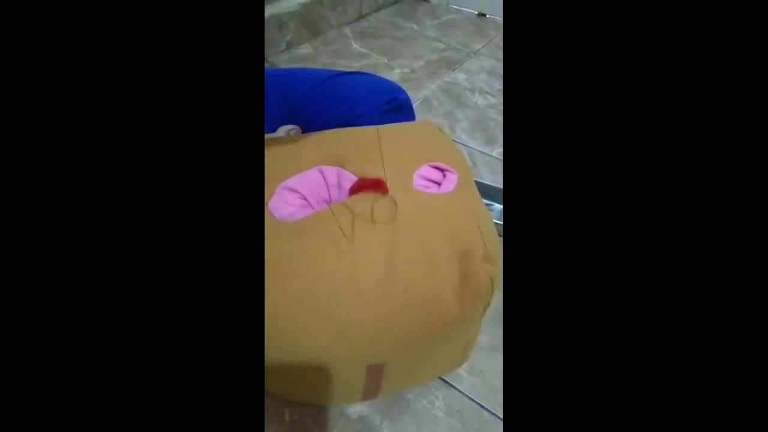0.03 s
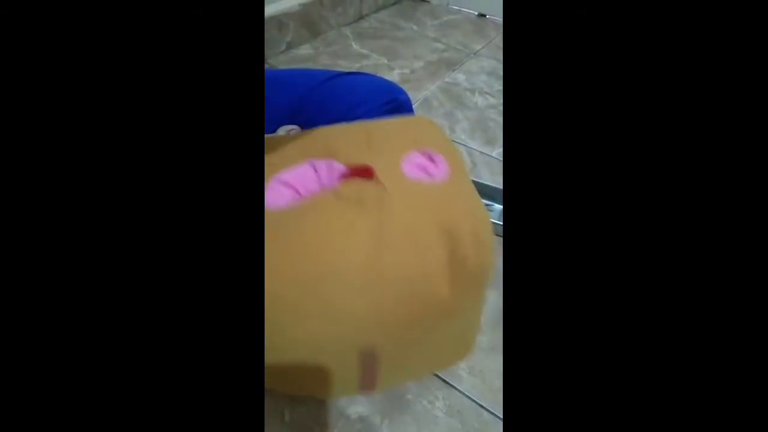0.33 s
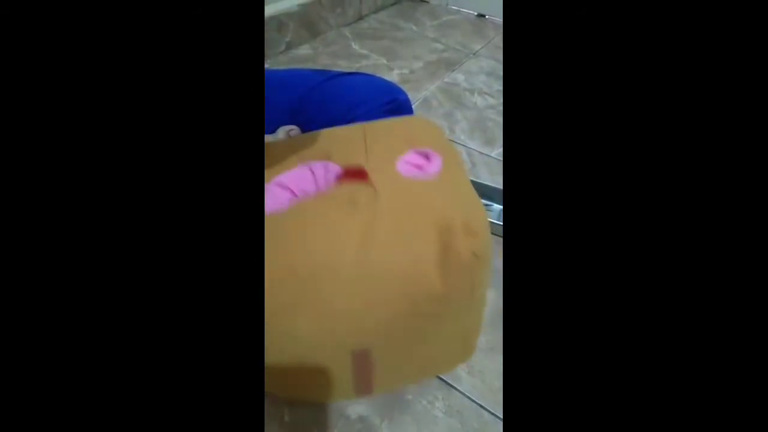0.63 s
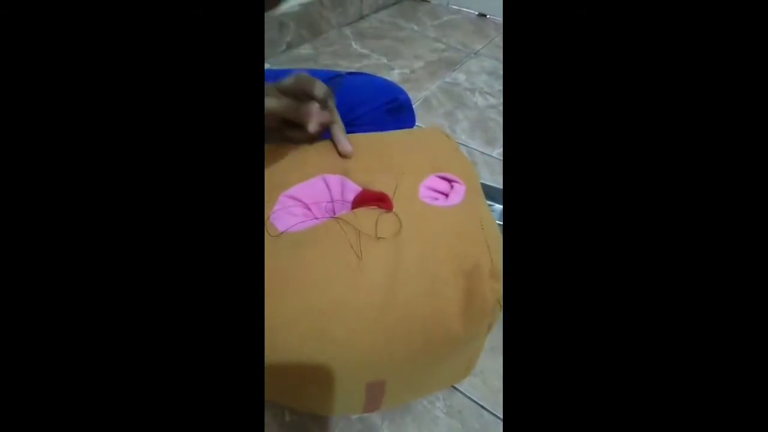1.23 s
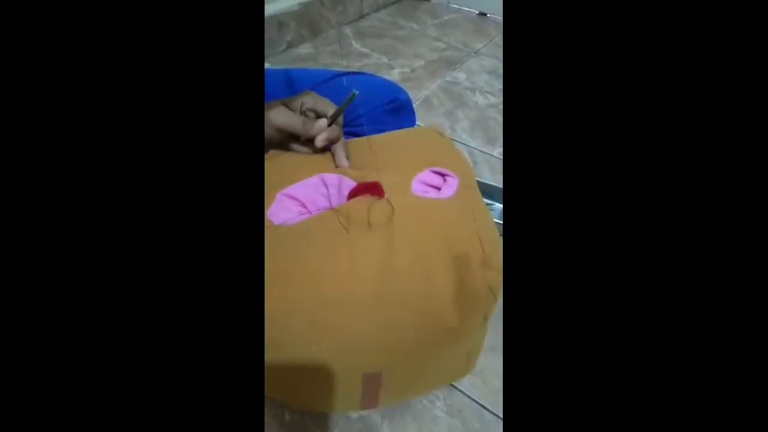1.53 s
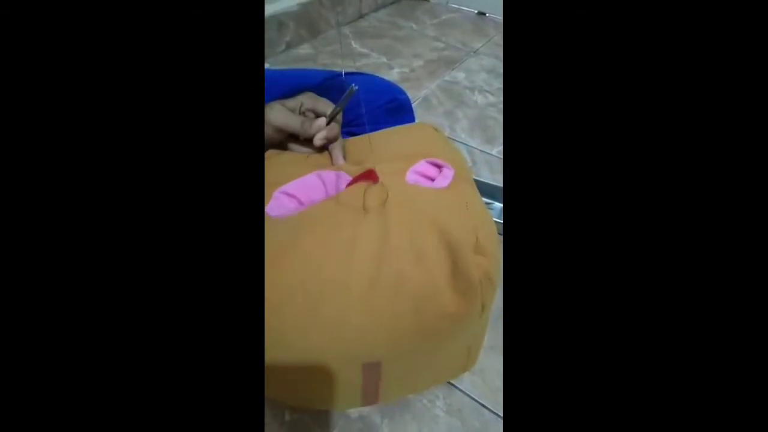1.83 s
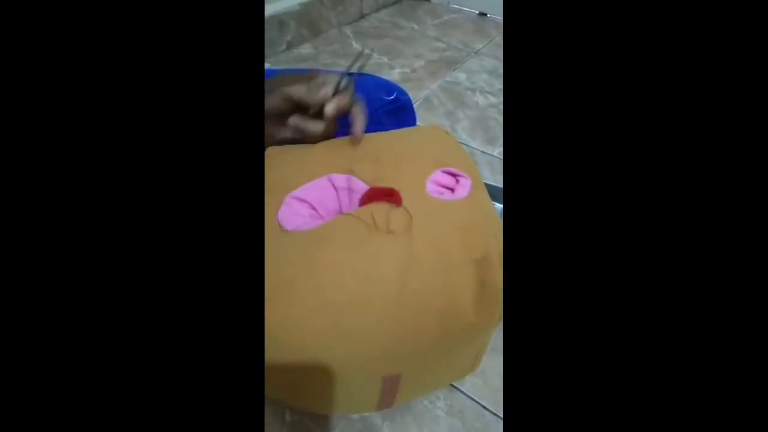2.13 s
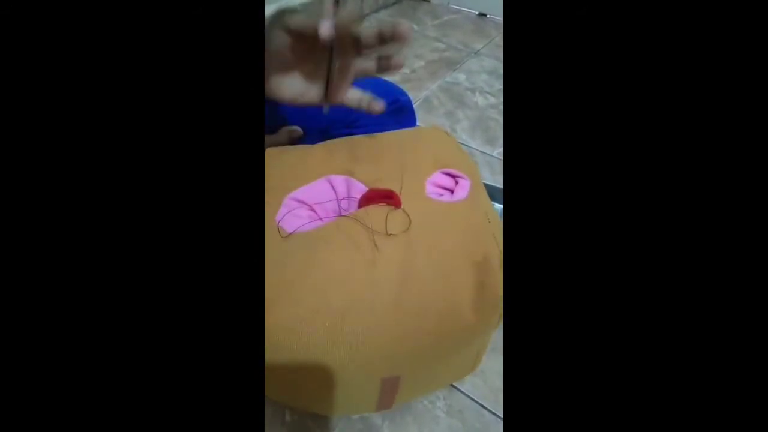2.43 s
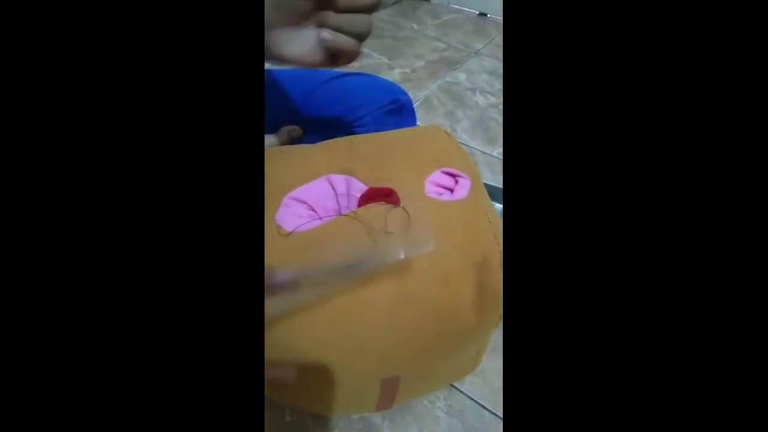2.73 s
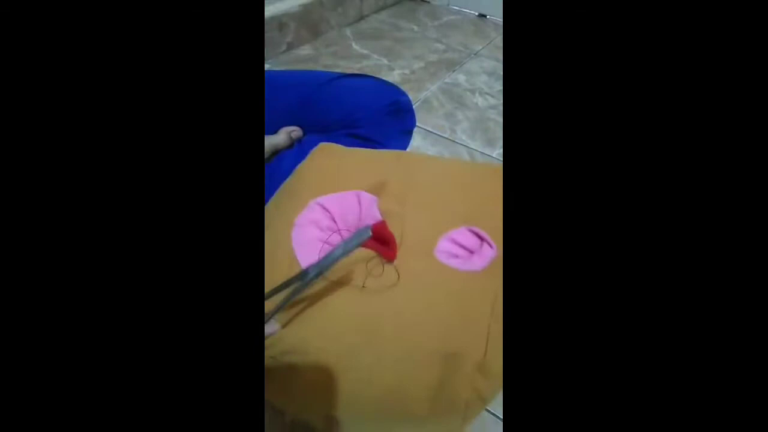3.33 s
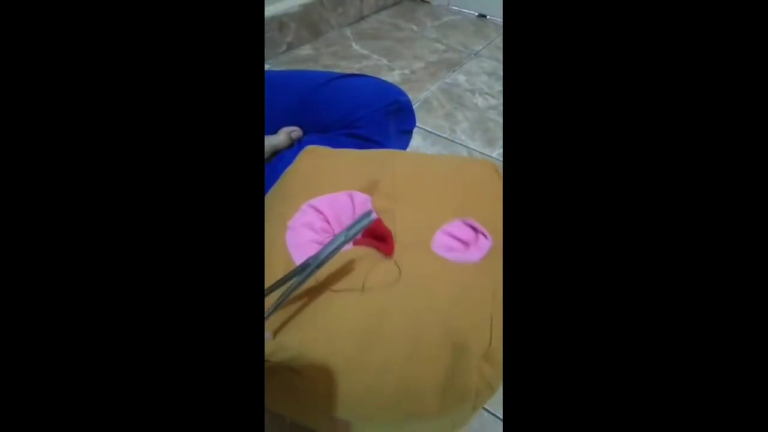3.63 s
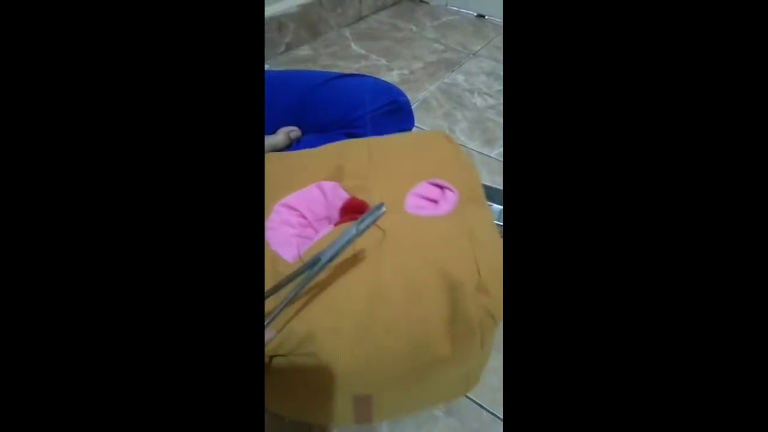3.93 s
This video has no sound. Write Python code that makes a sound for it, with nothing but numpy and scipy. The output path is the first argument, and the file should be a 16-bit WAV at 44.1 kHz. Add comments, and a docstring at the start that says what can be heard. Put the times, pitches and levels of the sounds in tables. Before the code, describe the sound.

Steel scissors are handled close by in a small room. A faint slide at 0.5 seconds leads to one bright clink at 1 second and a dry tick at 3 seconds. A small hollow knock follows at about 3.5 seconds. Throughout, a fan hisses steadily and its draught buffets the microphone in quick low puffs and thumps, while cloth rustles very faintly now and then.

```python
"""Steel scissors are picked up and handled close by in a small tiled room: a faint slide, one bright
clink as the blades meet, one dry tick from the loose pivot. A fan hisses steadily, and its draught
buffets the microphone in quick low puffs and thumps. Cloth rustles faintly under the hands, and
near the end something gives a small hollow knock."""
import sys
import numpy as np
from scipy import signal
from scipy.fft import rfft, irfft
from scipy.io import wavfile
from scipy.ndimage import map_coordinates

SR = 44100
rng = np.random.default_rng(int(sys.argv[2]) if len(sys.argv) > 2 else 0)


def generate_wav(signal):
    """Clip the signal to [-1, 1] and save it as 16-bit WAV at the path in sys.argv[1]."""
    frames = np.transpose(np.atleast_2d(signal))
    scaled = np.clip(frames, -1, 1) * 32767
    pcm = np.round(scaled).astype(np.int16)
    wavfile.write(sys.argv[1], SR, pcm)


N = 4 * SR


def amp(db):
    """Decibels to gain."""
    return 10 ** (np.asarray(db) / 20)


def unit_rms(x):
    """Normalises to an rms of one."""
    return x / np.sqrt(np.mean(x ** 2) + 1e-20)


def equalise(x, curve):
    """Shapes the tone with an EQ curve of (f/Hz, level/dB) points."""
    hz, db = np.transpose(curve)
    bins_hz = np.fft.rfftfreq(len(x), 1 / SR)
    gain = amp(np.interp(np.log(bins_hz + 1), np.log(hz), db))
    return irfft(rfft(x) * gain, len(x))


def drift(rate_hz):
    """Smooth random modulation with an rms of one."""
    hz = np.fft.rfftfreq(N, 1 / SR)
    rolloff = np.exp(-(hz / rate_hz) ** 2) * (hz > 0)
    return unit_rms(irfft(rfft(rng.standard_normal(N)) * rolloff, N))


def swell(middle_s, length_s, edge):
    """Power envelope around a moment; a higher edge gives steeper fades."""
    distance = abs(2 * (np.arange(N) / SR - middle_s) / length_s)
    return np.exp(-np.minimum(distance, 20) ** edge)


def add(mix, start_s, sound):
    """Drops a sound into the mix at its cue."""
    part = mix[round(start_s * SR):][:len(sound)]
    part += sound[:len(part)]


# EQ of the fan's air hiss: f/Hz, relative level/dB
HISS_EQ = [(25, 17.5), (200, 8), (400, 1), (490, 2.5), (620, -2.5), (740, 1.5), (880, -0.5), (1050, 0.5),
           (1290, -1.5), (2050, 1.5), (2600, -0.5), (2850, -4), (5000, -10), (6200, -12), (6900, -19),
           (7400, -34.5), (8000, -60)]
# motor tones: f/Hz, level/dB
MOTOR_TONES = [(2564, -68.5), (507, -67.5), (1035, -70)]

def fan(hiss_db=-48, waver_db=0.64, wander_hz=2.5):
    """A steady bed of air hiss with a few faint, wavering motor tones."""
    air = unit_rms(equalise(rng.standard_normal(N), HISS_EQ))
    hiss = air * amp(hiss_db + waver_db * drift(rate_hz=12))
    whine = np.zeros(N)
    for hz, db in MOTOR_TONES:
        cycles = np.cumsum(hz + wander_hz * drift(rate_hz=6)) / SR
        whine += amp(db) * np.sqrt(2) * np.sin(2 * np.pi * cycles)
    return hiss + whine


# puffs of the draught: middle t/s, length/s, level/dB
DRAUGHT_PUFFS = [(0.059,0.0497,-32),(0.131,0.0498,-28),(0.247,0.0396,-27),(.34,0.05014,-28),(0.469,0.0407,-25),(0.521,0.0404,-29),(0.579,0.03965,-26),(0.774,.15,-32),
                 (0.961,.14,-33),(1.109,0.0603,-28),(1.278,0.07064,-29.5),(1.399,0.0399,-26),(1.5,0.02997,-26),(1.6,.11,-29),(1.7,0.0302,-25),(1.873,0.1213,-32),
                 (1.961,0.0696,-29),(2.037,0.03043,-27),(2.119,0.0791,-25),(2.21,0.03006,-26),(2.329,.11,-30),(2.441,0.04965,-30),(2.511,.04,-33.5),(2.67,0.0813,-32),
                 (2.734,0.02995,-27.5),(2.889,.1,-33),(3.039,.04,-33),(3.098,0.02974,-29),(3.181,0.1117,-35),(3.3,0.03015,-27.5),(3.38,0.0401,-30),(3.469,0.0898,-31),
                 (3.561,0.0495,-28),(3.62,.02,-27),(3.77,.02,-26.5),(3.838,0.0604,-28),(3.935,0.0919,-30)]
# EQ of the turbulent rumble: f/Hz, relative level/dB
EDDY_EQ = [(20, -18.5), (45, -20.5), (74, 2.5), (105, 1.5), (170, -1), (250, -5.5), (350, -16.5),
           (500, -30.5), (750, -42), (1400, -75.5)]

def draught(lull_db=-45, flutter_db=2, compression=0.69):
    """Eddies sweep over the microphone; each puff drives them harder and faster."""
    power = np.full(N, amp(lull_db) ** 2)
    for middle_s, length_s, db in DRAUGHT_PUFFS:
        power += amp(db) ** 2 * swell(middle_s, length_s, edge=4)
    eddies = unit_rms(equalise(rng.standard_normal(2 * N), EDDY_EQ))
    # compress the rumble so that the puffs carry the dynamics
    window = signal.windows.hann(int(0.068 * SR))
    eddy_power = np.abs(signal.oaconvolve(eddies ** 2, window / window.sum(), "same"))
    eddies = unit_rms(eddies / eddy_power ** (compression / 2))
    flutter = unit_rms(amp(flutter_db * drift(rate_hz=45.2)))
    envelope = np.sqrt(power) * flutter
    travel = np.cumsum(unit_rms(envelope) ** 0.15)  # varispeed: stronger air lifts the pitch
    return envelope * map_coordinates(eddies, [travel], order=3, mode="wrap")


# single hard eddies hitting the microphone: t/s, level/dB, f/Hz
HARD_EDDIES = [(0.109, -20, 218), (0.1235, -27, 237), (0.133, -21, 178), (0.149, -20, 135),
               (0.2616, -18.5, 178), (0.759, -17.5, 190), (0.8049, -18.5, 215.3), (0.908, -21, 130),
               (0.9292, -21, 135), (1.079, -18, 199), (1.0898, -20.5, 130.4), (1.126, -20.5, 123),
               (1.282, -23, 126), (1.3017, -20.5, 220.2), (1.3949, -10.5, 221.8), (1.3981, -10.5, 303),
               (1.5483, -23, 215.7), (1.621, -26, 163.7), (1.6328, -18.5, 193), (1.689, -22.5, 221.3),
               (1.7093, -17, 202.5), (1.9101, -20.5, 219), (2.2004, -24.5, 240), (2.713, -16.5, 173),
               (2.8185, -20.5, 215), (2.882, -22.5, 179.9), (2.9225, -18, 178), (3.0368, -21, 168.4),
               (3.1078, -19, 168), (3.2775, -18, 198), (3.2861, -19.5, 175), (3.3613, -21, 144),
               (3.392, -21.5, 185), (3.5419, -25.5, 240), (3.548, -22.5, 190), (3.612, -29, 280),
               (3.6152, -16.5, 138), (3.8151, -21, 230), (3.8284, -19, 198), (3.8538, -23, 192),
               (3.9046, -18.5, 127.6), (3.945, -20, 148), (3.954, -23.5, 140)]

def thumps(low_cut_hz=94, q=1.96):
    """Each hard eddy is one push and pull of pressure; the microphone's low cut adds a short wobble."""
    t, pressure = np.arange(N) / SR, np.zeros(N)
    for middle_s, db, hz in HARD_EDDIES:
        phase = 2 * np.pi * hz * (t - middle_s)
        pressure -= amp(db) * phase * (8 / (7 + phase ** 2)) ** 4
    omega = 2 * np.pi * low_cut_hz
    resonant_cut = signal.bilinear([1, 0, 0], [1, omega / q, omega ** 2], SR)
    return signal.lfilter(*resonant_cut, pressure)


# cloth rustles: middle t/s, length/s, level/dB, centre f/Hz, width/octaves
CLOTH_RUSTLES = [(0.519, 0.068, -59, 4920, 0.43), (0.826, 0.04, -60.5, 5700, 0.21),
                 (1.68, 0.26, -65.5, 2400, 0.44), (1.95, 0.16, -65.5, 5660, 0.34),
                 (2.874, 0.12, -61, 5000, 0.5), (3.646, 0.19, -62, 4324, 0.62),
                 (3.834, 0.11, -57.5, 4300, 0.77)]

def cloth(grain_db=3):
    """Hands brush over fabric in soft, grainy swishes."""
    hz, rustle = np.fft.rfftfreq(N, 1 / SR), np.zeros(N)
    for middle_s, length_s, db, centre_hz, octaves in CLOTH_RUSTLES:
        band = np.exp(-2 * (np.log2((hz + 1) / centre_hz) / octaves) ** 2)
        fibres = rng.standard_normal(N) * amp(grain_db * drift(rate_hz=78))
        swish = unit_rms(irfft(rfft(fibres) * band, N))
        rustle += amp(db) * swish * np.sqrt(swell(middle_s, length_s, edge=1.7))
    return rustle


def slide(middle_s, length_s=0.13, level_db=-61.5, pitch_hz=3630, jitter_hz=74):
    """Steel slides lightly: a thin, even scrape around one unsteady pitch."""
    cycles = np.cumsum(pitch_hz + jitter_hz * drift(rate_hz=200)) / SR
    envelope = np.sqrt(2 * swell(middle_s, length_s, edge=3))
    return amp(level_db) * envelope * np.sin(2 * np.pi * cycles)


# hand-damped blade modes, the bright attack: f/Hz, relative level/dB, T60/s
BLADE_MODES = [(2900, -11.5, .008), (3394, -9, 0.014), (4535, -11.5, .014), (5380, -10.5, .016),
               (5640, -20, 0.009), (6390, -0.5, 0.012), (7060, -4.5, 0.0063)]
# faint long ring of the blades: f/Hz, relative level/dB, T60/s
BLADE_RING = [(5286, -42, 0.44), (5410, -41, .46), (6348, -44, .28), (3400, -40, .25)]

def clink(level_db=-16.5, rise_s=0.00041, contact_s=0.00084):
    """Blade meets blade: a tiny scrape, modes that the hand damps at once, and a faint beating ring."""
    t = np.arange(SR // 2) / SR
    modes = sum(amp(db - 60 * t / t60) * np.sin(2 * np.pi * hz * t)
                for hz, db, t60 in BLADE_MODES + BLADE_RING)
    attack = 1 - np.exp(-t / rise_s)
    contact = amp(-15) * rng.standard_normal(len(t)) * np.exp(-t / contact_s)
    scrape = signal.sosfilt(signal.butter(2, [2200, 7000], "band", fs=SR, output="sos"), contact)
    direct = amp(level_db) * (modes * attack + scrape)
    return direct + room(direct, send_db=-11.5)


# EQ of the tiled room's reverb: f/Hz, relative level/dB
ROOM_EQ = [(1500, 0), (3400, -7.5), (4500, -7), (5100, 6), (5500, -4), (6300, -11), (6750, 2.5),
           (7300, -7.5)]

def room(x, send_db, t60_s=0.34, predelay_s=0.011):
    """The tiles answer after a short gap with a dense, dying tail of reflections."""
    t = np.arange(SR) / SR
    reflections = rng.standard_normal(SR) * (rng.random(SR) < 5000 / SR)  # about 5000 a second
    tail = equalise(reflections, ROOM_EQ) * amp(-60 * t / t60_s) * (t > predelay_s)
    return amp(send_db) * signal.fftconvolve(x, tail / np.linalg.norm(tail))[:len(x)]


# dead resonances of the pivot: f/Hz, width/Hz, relative level/dB
PIVOT_BANDS = [(3170, 770, 2), (4370, 550, -11.5), (6180, 600, -7.5), (2000, 1500, -19)]

def pivot_tick(level_db=-27.5):
    """The loose pivot snaps once: a dry tick through broad resonances that do not ring."""
    snap, direct = signal.unit_impulse(SR // 2), np.zeros(SR // 2)
    for hz, width_hz, db in PIVOT_BANDS:
        band_pass = signal.butter(2, [hz - width_hz / 2, hz + width_hz / 2], "band", fs=SR, output="sos")
        band = signal.sosfilt(band_pass, snap)
        direct += amp(level_db + db) * band / abs(band).max()
    return direct + room(direct, send_db=-14)


def knock(level_db=-30.5, pitch_hz=552, t60_s=0.065, rise_s=0.0025):
    """A soft bump wakes one short, hollow resonance."""
    t = np.arange(SR // 4) / SR
    envelope = amp(level_db - 60 * t / t60_s) * (1 - np.exp(-t / rise_s))
    return envelope * np.sin(2 * np.pi * pitch_hz * t)


def scene():
    """Scissors, cloth and a knock over the bed of fan and draught, in mono."""
    mix = fan() + draught() + thumps() + cloth() + slide(middle_s=0.54)
    add(mix, 1.005, clink())
    add(mix, 3.0353, pivot_tick())
    add(mix, 3.539, knock())
    return mix[None]


def record(dry):
    """Master EQ: trims the sub rumble and cuts the top end steeply."""
    low_cut = signal.butter(3, 29, "high", fs=SR, output="sos")
    high_cut = signal.ellip(10, 0.3, 70, 7550, fs=SR, output="sos")
    return signal.sosfilt(np.vstack([low_cut, high_cut]), dry)


dry = scene()
out = record(dry)
generate_wav(out)
```